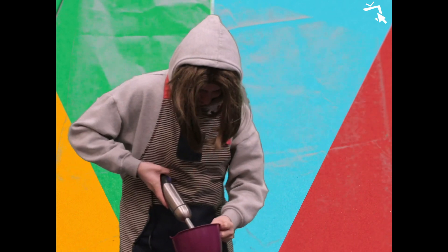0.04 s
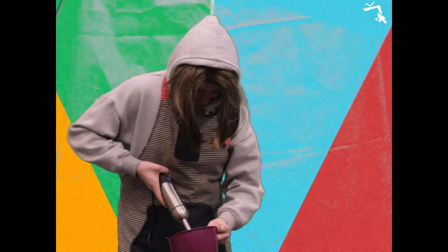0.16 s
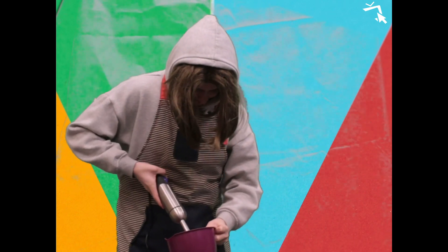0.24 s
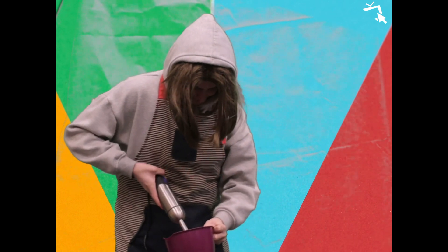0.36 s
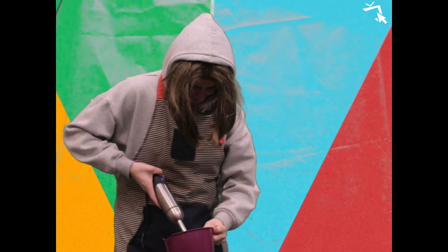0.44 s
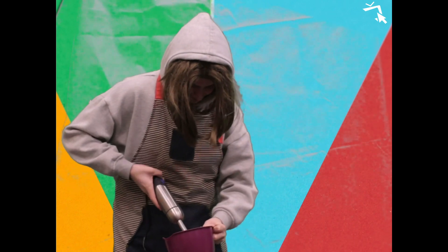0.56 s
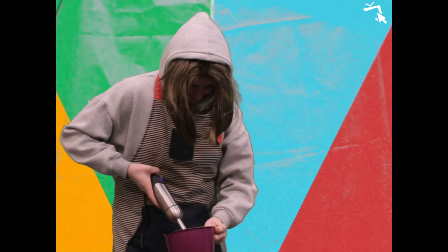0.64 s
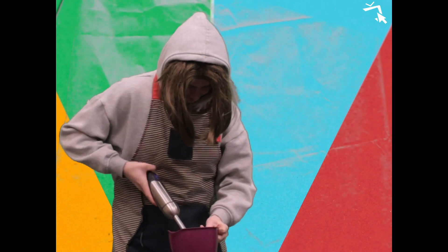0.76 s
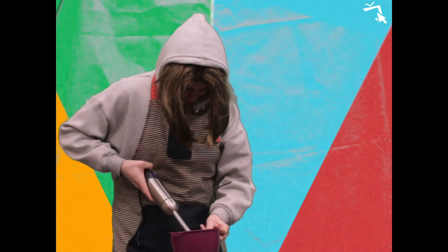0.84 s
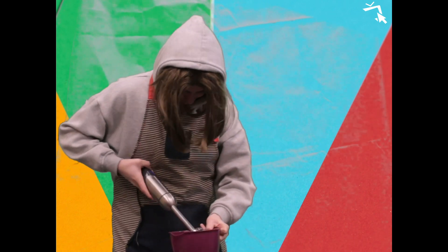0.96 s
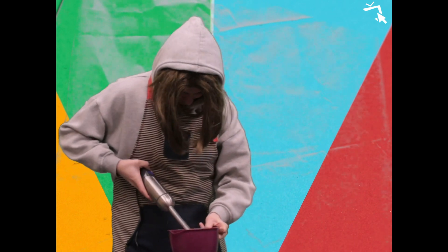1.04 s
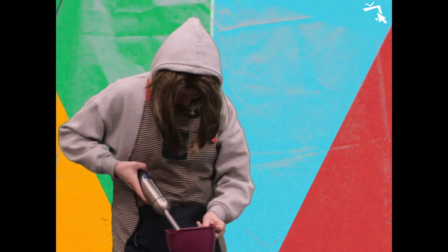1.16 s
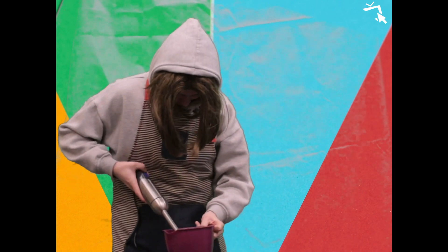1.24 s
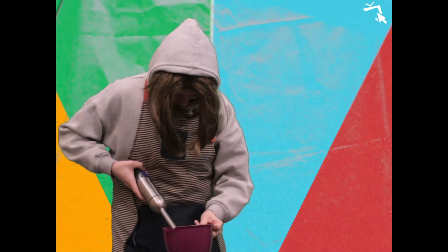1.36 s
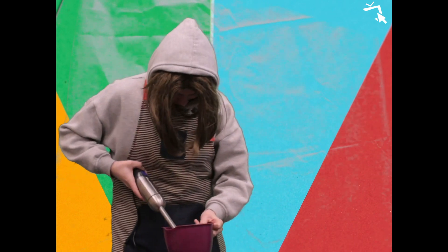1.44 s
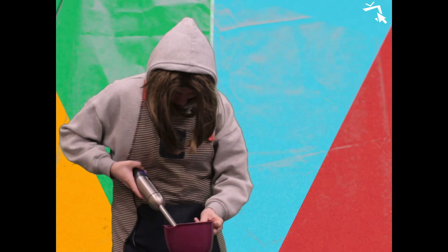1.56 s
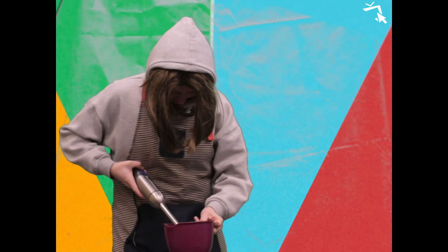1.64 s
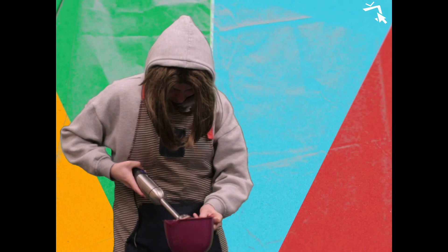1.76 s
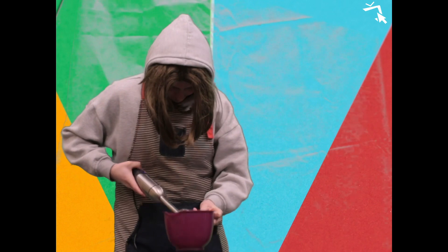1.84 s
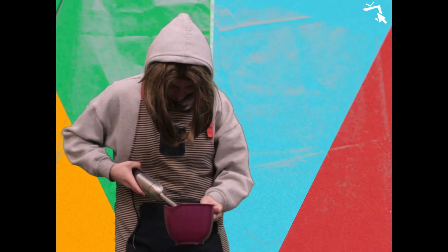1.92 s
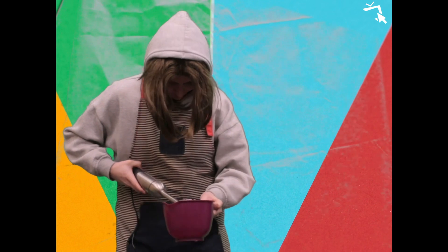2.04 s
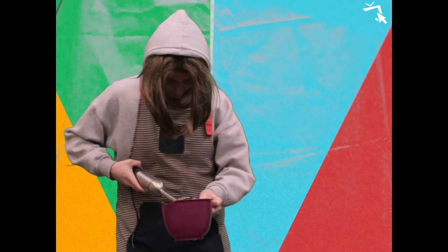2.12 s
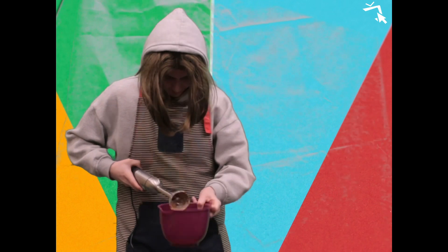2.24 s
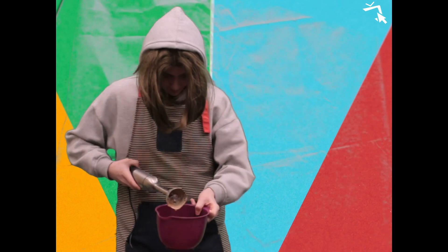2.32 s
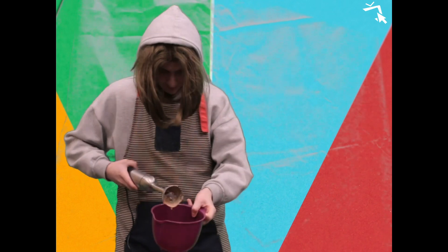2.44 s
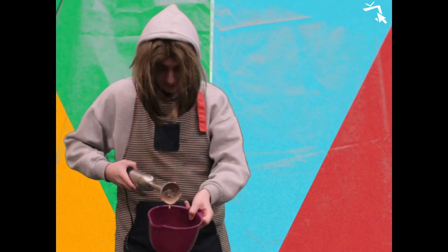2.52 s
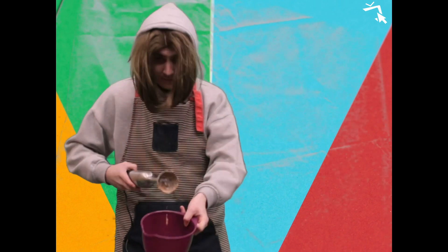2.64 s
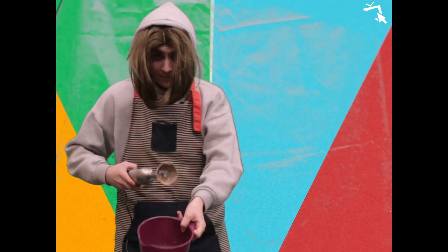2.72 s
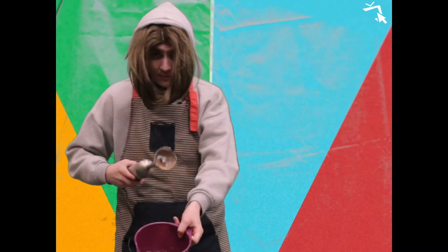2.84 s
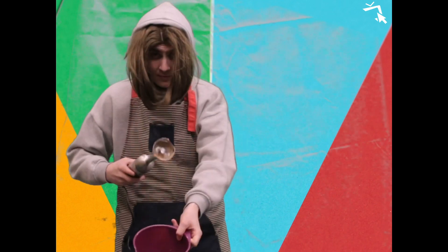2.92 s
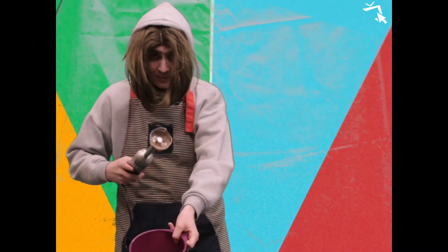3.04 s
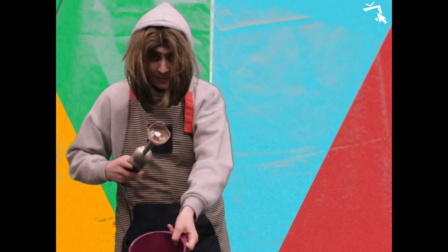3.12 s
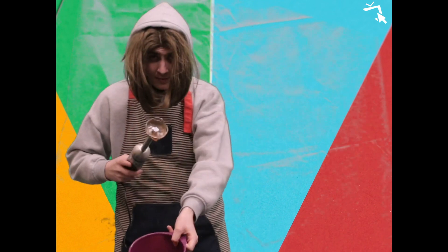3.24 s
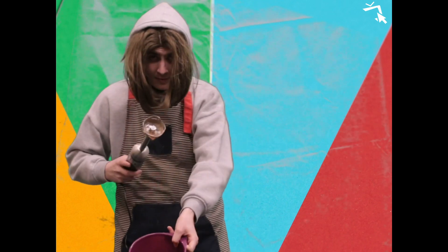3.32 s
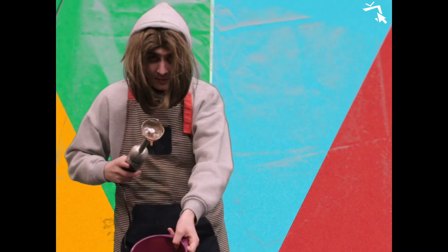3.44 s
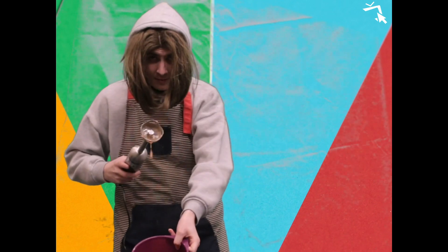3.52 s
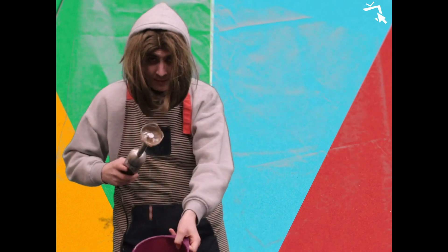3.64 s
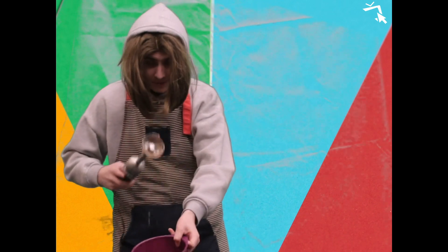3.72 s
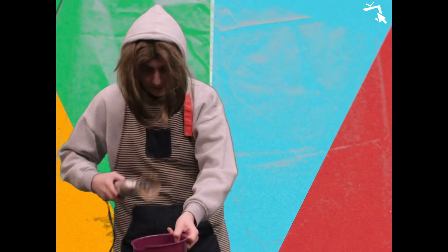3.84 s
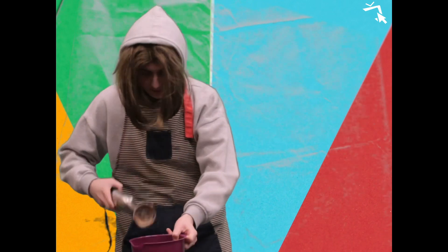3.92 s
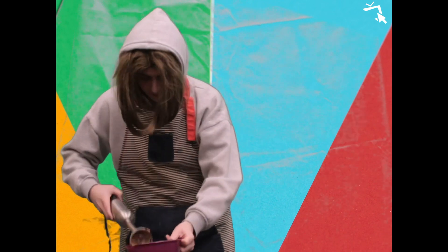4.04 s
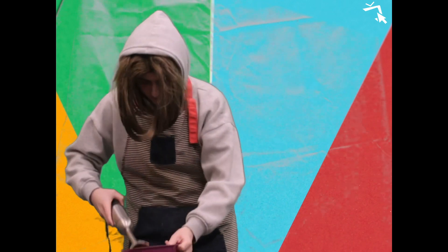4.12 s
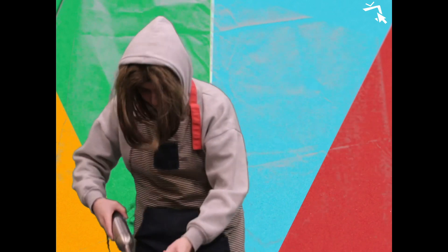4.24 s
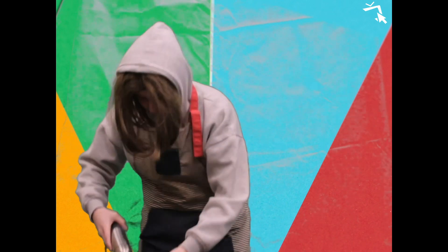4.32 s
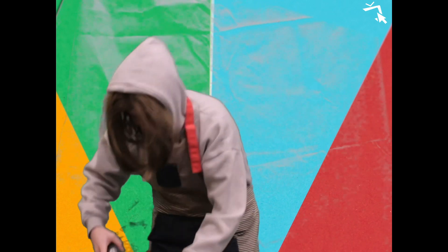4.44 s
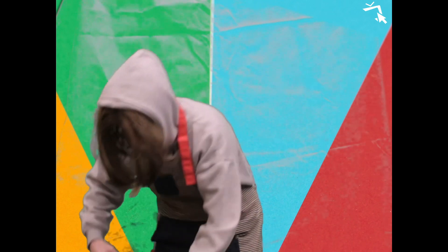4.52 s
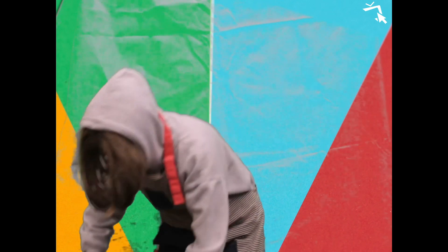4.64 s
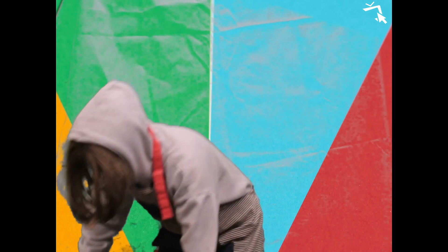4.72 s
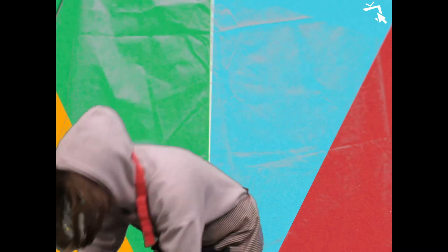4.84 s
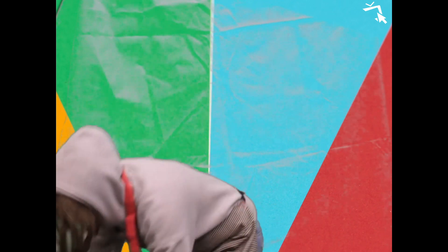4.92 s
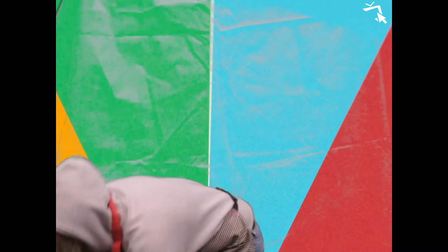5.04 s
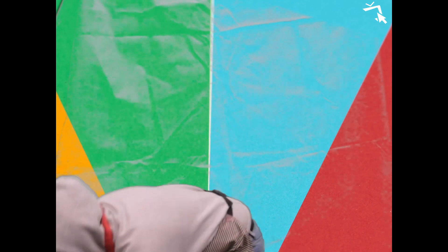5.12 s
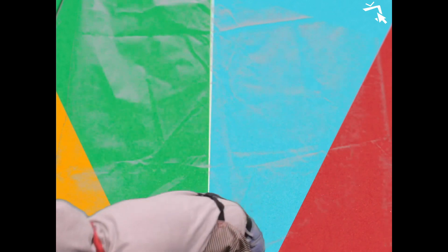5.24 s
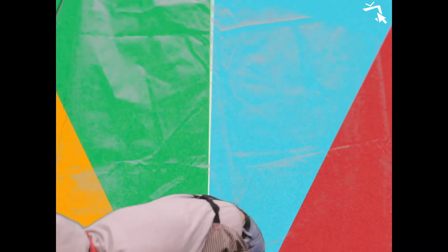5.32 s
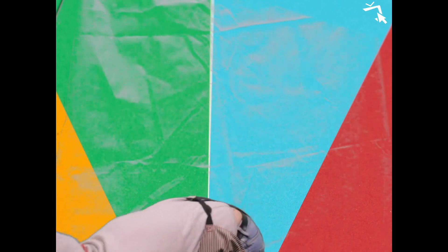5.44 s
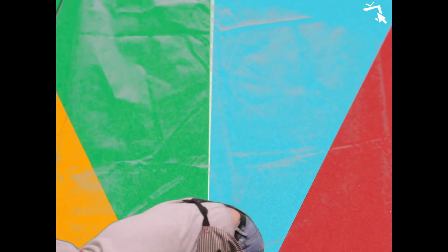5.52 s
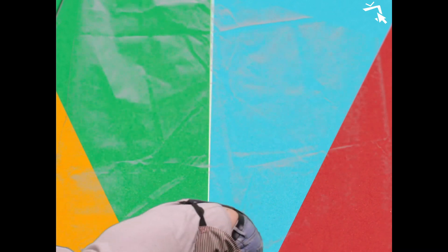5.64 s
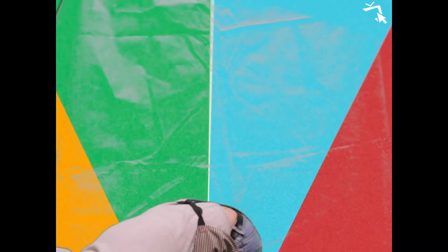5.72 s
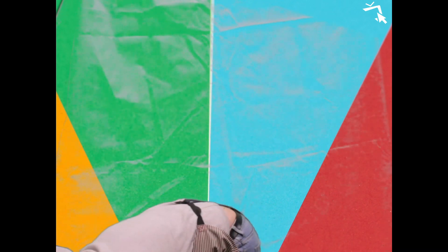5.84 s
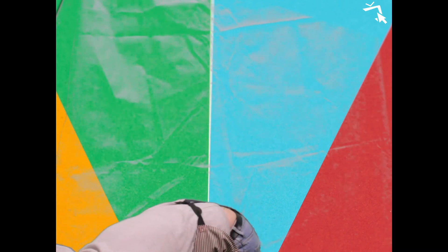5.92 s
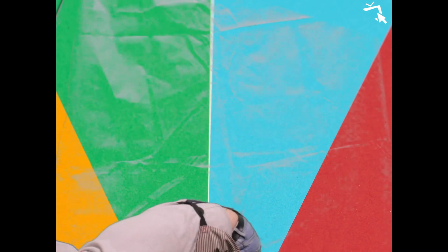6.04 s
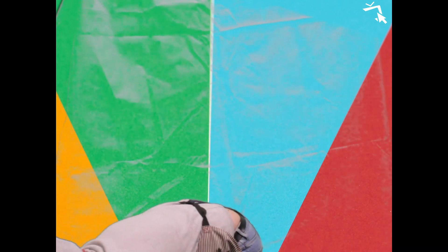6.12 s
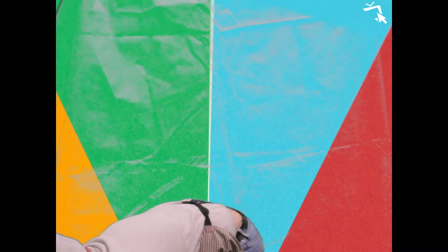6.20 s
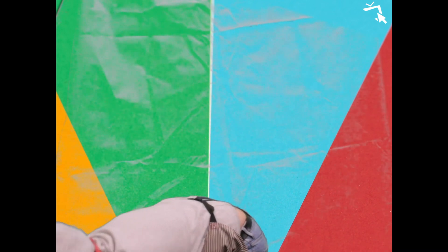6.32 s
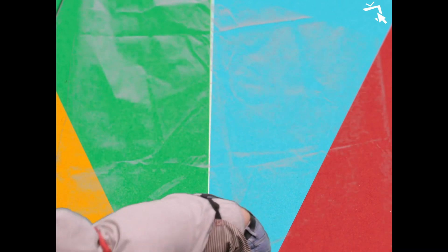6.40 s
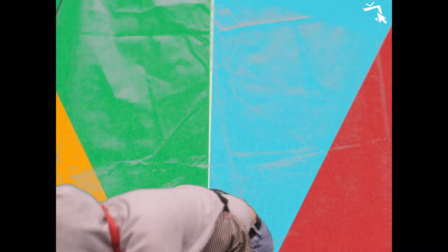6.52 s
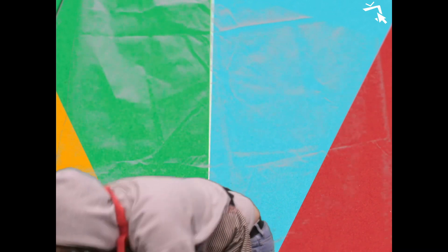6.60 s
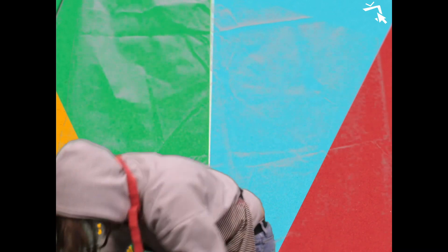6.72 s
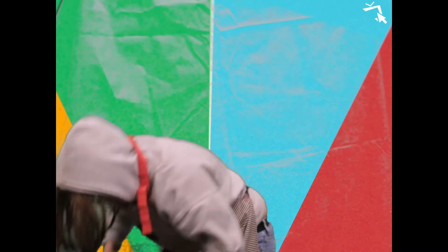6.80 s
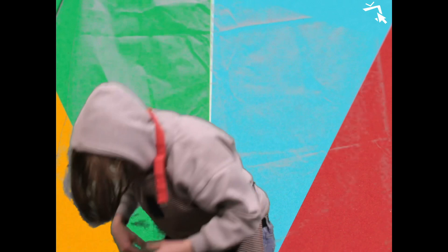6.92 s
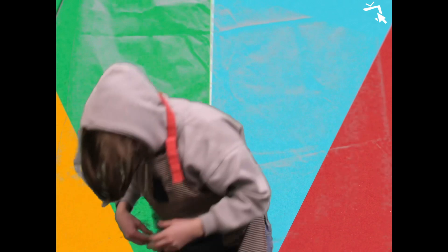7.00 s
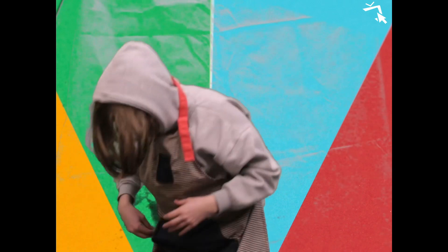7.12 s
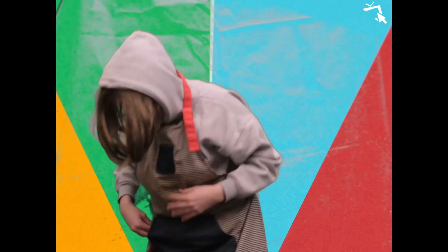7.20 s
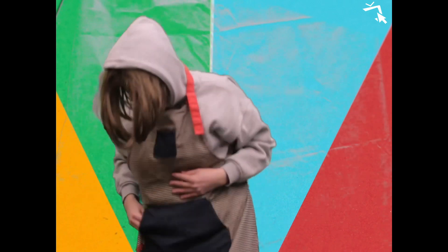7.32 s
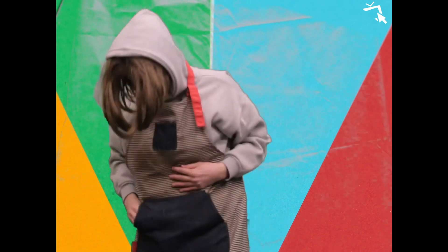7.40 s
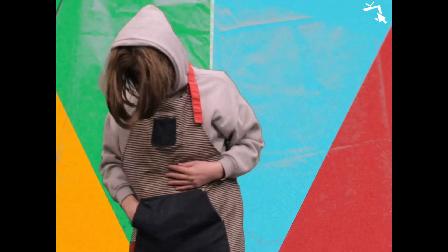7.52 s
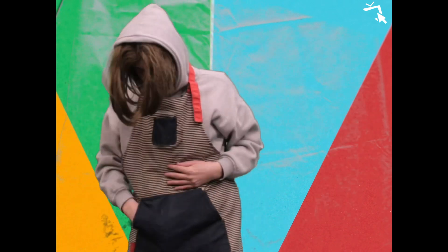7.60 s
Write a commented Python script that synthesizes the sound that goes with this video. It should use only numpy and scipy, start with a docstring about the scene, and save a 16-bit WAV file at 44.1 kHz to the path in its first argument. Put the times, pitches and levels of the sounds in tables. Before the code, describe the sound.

A stick blender drums and chatters in a plastic bowl, rasps out, winds down whining, then clothes rustle and bowl and blender are knocked and set down.

```python
"""A handheld stick blender drums and chatters with its bell pressed into a plastic bowl: multiples of the shaft
speed and noise pulsing with each turn. Switched off, it rasps up the bowl's wall and winds down in the air as a
falling whine with a thin whistle, while drops ring briefly and the slow rotor catches once a turn. Clothes rustle
near the microphone as filtered noise, with dry snaps; later bowl and blender are knocked and set down, with
ringing bowl modes, sharp cracks and a short drag on the floor. A small room and a faint hush lie under it all."""
import sys
import numpy as np
from scipy import signal
from scipy.fft import rfft, irfft
from scipy.io import wavfile
from scipy.ndimage import uniform_filter1d

SR = 44100
rng = np.random.default_rng(int(sys.argv[2]) if len(sys.argv) > 2 else 0)


def store_pcm(level_fs):
    """Save levels as 16-bit WAV."""
    pcm = np.round(np.clip(level_fs, -1, 1) * 32767).astype(np.int16)
    wavfile.write(sys.argv[1], SR, np.atleast_2d(pcm).T)


N = 337982
TIME = np.arange(N) / SR   # s


def amp(db):
    """Gain of a level in dB."""
    return 10 ** (np.asarray(db) / 20)


def rms_one(x):
    """Scale to unit power."""
    return x / np.sqrt(np.mean(x ** 2) + 1e-20)


def in_time(rows):
    """Columns of a curve, read at every sample."""
    s, *columns = np.transpose(rows)
    return [np.interp(TIME, s, column) for column in columns]


def within(rows):
    """One while a curve lasts, with 20 ms fades outside it."""
    start, end = rows[0][0], rows[-1][0]
    return np.interp(TIME, [start - .02, start, end, end + .02], [0, 1, 1, 0])


def at_hz(points, hz):
    """Level of a spectrum, read on a log frequency axis."""
    point_hz, point_db = np.array(points)[:, 0], np.array(points)[:, 1]
    return np.interp(np.log(np.maximum(hz, 1)), np.log(point_hz), point_db)


def colour(x, spectrum):
    """Filter by a spectrum and scale to unit power."""
    gain = amp(at_hz(spectrum, np.fft.rfftfreq(N, 1 / SR)))
    return rms_one(irfft(rfft(x) * gain, N))


def high_pass(x, order, hz):
    """Keep what lies above a frequency."""
    return signal.sosfilt(signal.butter(order, hz, "high", fs=SR, output="sos"), x)


def drift(rate):
    """Random wander: normal values at a rate per second, joined by straight lines."""
    knots = rng.standard_normal(int(N / SR * rate) + 2)
    return np.interp(TIME * rate, np.arange(len(knots)), knots)


def grains(per_s, spread_db):
    """Random clicks of uneven size and either sign."""
    sizes = amp(spread_db * np.minimum(rng.exponential(1, N), 4)) * rng.choice([-1, 1], N)
    return sizes * (rng.random(N) < per_s / SR)


def ring(clicks, hz, t60):
    """A damped resonance: a unit click starts a sine of height about 1 that loses 60 dB in t60 seconds."""
    radius, angle = amp(-60 / (t60 * SR)), 2 * np.pi * hz / SR
    feedback = [1, -2 * radius * np.cos(angle), radius * radius]
    return signal.lfilter([0, np.sin(angle)], feedback, clicks + 1e-18)


def clicks_at(times, heights):
    """A train of single-sample clicks."""
    out = np.zeros(N)
    np.add.at(out, np.round(np.asarray(times) * SR).astype(int), heights)
    return out


def each_turn(turns):
    """One click per revolution."""
    return np.diff(np.floor(turns), prepend=np.floor(turns[0]))


def pressed_bell(turns):
    """Each turn drums the bowl; loose contacts chatter in step with it; the drumming throbs as the bell
    wanders, and both swell when the bell skips."""
    # Bell on the bowl. Each row: time in seconds, drumming in dB, chatter in dB, lift of the treble in dB
    pressed = [(0.0, -23, -29.5, 2.5), (0.444, -24.5, -26.5, 1.5), (.58, -23.5, -28, 1.5),
               (0.628, -25, -29.5, 12), (0.72, -29, -28, 6)]
    # Harmonics of the drumming. Each row: multiple of the shaft speed, relative level in dB
    drumming = [(1, -19.5), (2, 1), (3, 2), (4, -2), (5, -18), (6, -11.5), (7, -10.5), (8, -19), (9, -12),
                (10, -18), (11, -24), (12, -18), (13, -24), (14, -24), (15, -25.5), (16, -27), (17, -36.5),
                (18, -31)]
    # Colour of the chatter. Each row: frequency in Hz, relative level in dB
    chatter_colour = [(60, -37), (150, -22), (220, -19.5), (400, -10), (620, 1), (800, -8), (1100, -21),
                      (1500, -12.5), (2000, -13), (3000, -16), (3700, -28), (5000, -27.5), (7000, -37.5),
                      (15500, -56)]
    # The bell skips and chatters harder. Each row: centre in seconds, extra level in dB, half-length in seconds
    skips = [(.003, 2, 0.0061), (0.056, 6.5, 0.019), (0.097, 6.5, 0.0082), (.172, 5, 0.0043),
             (0.271, 8, 0.014), (0.349, 5, 0.0061), (0.408, 4, 0.007), (0.46, 3, .008), (0.538, 0, 0.018)]
    throb_hz, throb_peak_s, throb_db = 11.37, 0.11, 2   # the bell wanders round on the bottom of the bowl
    drum_db, chatter_db, treble_db = in_time(pressed)
    throb = np.cos(2 * np.pi * throb_hz * (TIME - throb_peak_s))
    skip_db = sum(db * np.exp(-((TIME - s) / length) ** 2) for s, db, length in skips)

    short = int(.9 * SR)   # the drumming is over by then
    drum = np.zeros(N)
    for order, db in drumming:
        partial = np.sin(2 * np.pi * order * turns + 0.148 * order ** 2)
        drum[:short] += (amp(db + 4.5 * drift(30.38)) * partial)[:short]
    drum /= np.std(drum[:short])
    drum *= amp(drum_db + throb_db * throb + 0.32 * skip_db)

    gate = (1 + np.cos(2 * np.pi * turns)) + .7   # opens once a turn
    chatter = colour(gate * (rng.standard_normal(N) + grains(900, 3)), chatter_colour)
    treble = high_pass(chatter, 2, 6500)   # kept out of the surges
    surge = amp(skip_db + 2.14 * drift(38.3))
    chatter = amp(chatter_db) * (surge * (chatter - treble) + amp(treble_db) * treble)
    return within(pressed) * (drum + chatter)


def rasp(curve, spectrum, slips):
    """Slips ring the bowl's lower modes and scrape brightly."""
    grit = 0.61   # steady noise under the slips
    low_db, bright_db = in_time(curve)
    slips = rms_one(slips) + grit * rng.standard_normal(N)
    ringing = rms_one(bowl(slips, .5 * slips, 0 * slips))
    return within(curve) * (amp(low_db) * ringing + amp(bright_db) * colour(slips, spectrum))


def wall_rasp(turns):
    """The bell rasps up the wall of the bowl: uneven blade hits once a turn among random slips."""
    # Course of the rasp. Each row: time in seconds, low ring in dB, bright scrape in dB
    course = [(.70, -39, -42), (.725, -30, -27), (.754, -18.5, -20), (.782, -38.5, -19.5),
              (.805, -28, -24.5), (.815, -48, -44)]
    # Colour of the scrape. Each row: frequency in Hz, relative level in dB
    scrape_colour = [(500, -37.5), (800, 1.5), (960, 3), (1200, -2.5), (1480, 3), (1900, -9.5),
                     (2400, -8.5), (3300, -17), (4640, -19), (6000, -27.5), (7200, -22.5), (15500, -49)]
    blade_hits = each_turn(turns) * amp(1.5 * rng.standard_normal(N))
    return rasp(course, scrape_colour, blade_hits + .4 * grains(900, 2))


def coasting_motor(speed, turns):
    """Multiples of the falling speed slide through the housing's colour; commutator bars whistle above."""
    # Free running. Each row: time in seconds, level of the whine in dB
    coasting = [(0.815, -31), (1.073, -35), (1.319, -40.5), (1.561, -44.5), (1.7, -53), (1.85, -68),
                (2.1, -70), (2.2, -75)]
    # Housing's colour for whine and brushes. Each row: frequency in Hz, relative level in dB
    housing = [(90, -14), (160, -11), (260, -8), (320, 4.5), (500, 5), (750, 2), (1050, 5), (1350, -4),
               (1600, -2), (1800, -1), (2100, 1.5), (2500, -11), (3200, -19), (5000, -64)]
    # Colour of the air and bearing noise. Each row: frequency in Hz, relative level in dB
    air_colour = [(59, -51), (100, 3), (238, -22), (319, 0), (497, -15), (541, -28), (1020, 1.5),
                  (1460, -18.5), (2090, -3), (3390, -6), (15500, -23.5)]
    # Relative level in dB of multiples 1, 2, .. of the bar rate
    whistles_db = [10, 1, -3, -3, -3, -4]
    # Colour of the whistle. Each row: frequency in Hz, relative level in dB
    whistle_colour = [(1500, -22), (2500, -13), (3500, -7), (4500, -0.5), (5300, 0), (6500, -3), (8300, -3),
                      (9300, -28)]
    # Course of the whistle. Each row: time in seconds, gain in dB
    whistling = [(.82, -59), (1.15, -58), (1.3, -56.5), (1.55, -57.5), (1.75, -62), (1.85, -74),
                 (1.9, -100)]
    bars = 24   # on the commutator
    waver_db, air_below_db = 3.5, -13.5   # waver of each multiple; air against the whine

    short = int(2.3 * SR)   # the motor is silent by then
    whine, whistle = np.zeros(N), np.zeros(N)
    for order, start in enumerate(rng.random(30), 1):
        waver = drift(8.93) + .6 * drift(39.94)
        db = at_hz(housing, order * speed) + waver_db * waver - 0.24 * order
        whine[:short] += (amp(db) * np.sin(2 * np.pi * (order * turns + start)))[:short]
    whine /= np.sqrt(uniform_filter1d(whine ** 2, size=4096) + 1e-9)   # even out the power
    for k, db in enumerate(whistles_db, 1):
        db = db + at_hz(whistle_colour, k * bars * speed) + 3 * drift(25)
        whistle[:short] += (amp(db) * np.sin(2 * np.pi * k * bars * turns))[:short]

    air = colour(rng.standard_normal(N), air_colour)
    rub = (1 + np.cos(2 * np.pi * turns)) ** 1.1 + 0.24   # the brushes rub hardest once a turn
    brushes = colour(rub * rng.standard_normal(N), housing)
    clean = np.clip((speed - 35) / 60, 0, 1)   # a slow rotor rattles rather than sings
    body = clean * whine + (1.2 - clean) * brushes + amp(air_below_db) * air
    return within(coasting) * amp(in_time(coasting)[0]) * body + (
        within(whistling) * amp(in_time(whistling)[0]) * whistle)


def drops():
    """Drops flung from the blade: each is a short ring with a bright tick."""
    # Each row: start in seconds, level in dB, pitch in Hz
    flung = [(0.8943, -22.5, 2860), (0.9555, -25, 2540), (1.01, -29.5, 2790), (1.0458, -18.5, 2260),
             (1.0686, -24.5, 2380), (1.1047, -23.5, 2540), (1.137, -29.5, 2530), (1.1907, -24.5, 2900),
             (1.215, -33, 2890)]
    tick_db, tick_spread_db = -43, 4
    heights = amp(tick_db + tick_spread_db * rng.standard_normal(len(flung)))
    ticks = ring(clicks_at([s for s, _, _ in flung], heights), 8300, 0.0059)
    return ticks + sum(ring(clicks_at([s], amp(db)), hz, 0.0063) for s, db, hz in flung)


def catches(turns):
    """The slow rotor catches once a turn and rings a few modes, each with a drifting strength."""
    # Course of the catching. Each row: time in seconds, strength in dB
    catching = [(1.2, -56), (1.5, -47), (1.7, -50), (1.95, -50), (2.05, -51), (2.1, -57), (2.2, -66)]
    # Modes it rings. Each row: frequency in Hz, relative level in dB, 60 dB decay in seconds
    modes = [(700, -8, .03), (1050, 0, .035), (1620, -5, .025), (2050, -13, .02)]
    catch_s = 1.957   # moment of one catch, sets the angle
    ticks = each_turn(turns - turns[round(catch_s * SR)])
    ticks = ticks * within(catching) * amp(in_time(catching)[0])
    soft_contact = np.hanning(30) / 9
    ticks = np.convolve(ticks, soft_contact)[:N]
    return sum(ring(ticks * amp(db + 1.2 * drift(18)), hz, t60) for hz, db, t60 in modes)


def bowl(low, mid, high):
    """The bowl's modes ring, with one drive each for those below 1 kHz, up to 2.6 kHz and above."""
    # Each row: frequency in Hz, relative level in dB, 60 dB decay in seconds
    modes = [(262, -30.5, 0.073), (382, -40.5, 0.044), (565, -12, 0.11), (592, -20, 0.053), (626, 1, 0.043),
             (741, -10, .04), (830, -10.5, 0.033), (1312, -15.5, 0.02), (1490, -15, 0.016),
             (1880, -11.5, 0.011), (2260, -13, 0.0072), (3320, -20.5, 0.0044), (4900, -26.5, 0.0067)]
    out = np.zeros(N)
    for hz, db, t60 in modes:
        drive = low if hz < 1000 else mid if hz < 2600 else high
        out += amp(db) * ring(drive, hz, t60)
    return out


def knocks():
    """Blows on the bowl: contact hardness and place decide how much the upper modes get."""
    # Each row: time in seconds, strength in dB, lift of the middle modes in dB, lift of the high modes in dB
    blows = [(4.1357, -53.5, 7, 30), (4.2223, -49.5, -10, 36), (4.2658, -43.5, -6, 33.5),
             (4.2863, -20.5, 0, 0), (4.3017, -45, -2, 35), (4.3398, -29.5, -19, 17), (4.3624, -48, -4, 26),
             (4.4123, -40, -12, 20), (4.652, -30, 1, 17), (4.9222, -40, 16, 16), (5.0044, -31.5, 7.5, 23.5),
             (5.264, -35, 11, 16), (5.3199, -23, 8, 20), (5.3974, -34.5, 12, 33.5), (5.5181, -3, 4, -14),
             (5.6405, -31.5, 15, -5), (5.7044, -49, 9, 6), (5.7636, -24.5, 10.5, 16),
             (5.7836, -27.5, 13.5, 14), (5.8134, -22.5, 0, 17), (6.1864, -51, 11.5, 2),
             (6.4217, -35, 15.5, 28.5), (6.5834, -39, 5, 3)]
    s, db, mid_db, high_db = np.transpose(blows)
    soft = np.hanning(24) / np.hanning(24).sum()   # longer contact for the low modes
    hard = np.hanning(9) / np.hanning(9).sum()
    low = np.convolve(clicks_at(s, -amp(db)), soft)[:N]
    mid = np.convolve(clicks_at(s, -amp(db + mid_db)), hard)[:N]
    high = np.convolve(clicks_at(s, -amp(db + high_db)), hard)[:N]
    return bowl(low, mid, high)


def snaps_and_cracks():
    """Dry snaps of cloth, cord and fingers, and the sharp cracks of some bowl knocks: dying noise over a thump."""
    # Each row: start in seconds, dull part in dB, bright part against it in dB, thump in dB
    bursts = [(2.6638, -41, -7, -32.5), (2.707, -28.5, -10, -40), (2.9071, -31, -11, -34),
              (3.7587, -36.5, -10, -41), (3.952, -36.5, -19, -68), (4.3865, -34.5, -18, -38),
              (4.6862, -32, 6, -30), (4.6927, -25, -17, -45), (4.7124, -30, -3, -23.5),
              (4.7819, -12.5, -13, -16), (4.836, -14, -13, -16.5), (5.0466, -37, 0, -52),
              (5.063, -21.5, -6, -46), (5.0672, -21, -22, -39), (5.0859, -18, -18, -35),
              (5.0905, -23, 0, -33), (5.0985, -17, -1.5, -16.5), (5.1076, -23, -14, -24),
              (5.11, -15.5, -26, -26), (5.296, -26, -13, -49), (5.3368, -17.5, -26, -37),
              (5.5185, -11.5, -32, -9.5), (5.6414, -28, -15, -52), (5.748, -34, -14, -51),
              (5.762, -23, -17, -33), (5.8131, -21, -3, -33), (6.2601, -33, -8, -33),
              (6.3803, -42, -18, -49), (6.3928, -29.5, -19, -43), (6.4212, -35, -16, -45),
              (6.4924, -31, -13, -41), (6.6277, -37, -17, -54), (7.5493, -38.5, -12, -52),
              (7.623, -36, -25, -46)]
    length = 900   # samples
    out, t = np.zeros(N + length), np.arange(length) / SR
    # a click, then noise that dies within milliseconds
    noise = rng.standard_normal((len(bursts), length)) * np.exp(-t / 0.00078) + 2.7 * (t == 0)
    dull = signal.sosfilt(signal.butter(2, [500, 4000], "band", fs=SR, output="sos"), noise)
    bright = signal.sosfilt(signal.butter(2, [4000, 12500], "band", fs=SR, output="sos"), noise)
    thump = np.sin(2 * np.pi * 290 * t) * np.exp(-t / 0.0024)
    for (s, db, bright_db, thump_db), a, b in zip(bursts, dull, bright):
        burst = a / np.abs(a).max() + amp(bright_db) * b / np.abs(b).max()
        out[round(s * SR):][:length] += amp(db) * burst + amp(thump_db) * thump
    return out[:N]


def floor_drag():
    """The bowl is dragged to rest on the floor: dense random slips."""
    # Course of the drag. Each row: time in seconds, low ring in dB, bright scrape in dB
    course = [(5.755, -69, -74), (5.768, -33.5, -35), (5.82, -37, -30.5), (5.871, -53.5, -44.5),
              (5.93, -64, -69)]
    # Colour of the scrape. Each row: frequency in Hz, relative level in dB
    scrape_colour = [(150, -3), (250, -3.5), (400, -15), (630, -3.5), (950, -8), (1270, -3), (1500, -12),
                     (1810, -10), (2420, -17.5), (4700, -25.5), (15500, -42)]
    return rasp(course, scrape_colour, grains(1500, 2))


def clothes():
    """Each movement swells and fades; fabric slides in lumps: a low rumble and a swish of clumped fibre ticks."""
    # Each row: peak in seconds, rumble in dB, swish in dB, rise in seconds, fall in seconds
    moves = [(1.25, -53, -50.5, 0.17, 0.26), (1.352, -44, -68, 0.026, 0.036),
             (1.6, -58.5, -51.5, 0.33, 0.55), (2.37, -63.5, -69, 0.088, 0.033),
             (2.705, -47, -49.5, .25, 0.082), (2.92, -47.5, -49, 0.16, 0.087),
             (3.1, -57.5, -59.5, 0.27, 0.13), (3.3, -58.5, -66.5, 0.11, 0.45),
             (3.66, -62.5, -76, 0.095, 0.092), (3.77, -64.5, -62, 0.058, 0.44),
             (4.155, -54.5, -66, 0.035, 0.069), (4.32, -50.5, -46.5, 0.084, 0.18),
             (4.61, -51.5, -51.5, 0.095, 0.16), (4.72, -45, -43, 0.011, 0.071),
             (4.77, -41, -47, 0.046, 0.039), (4.82, -35.5, -41.5, 0.073, 0.034),
             (4.875, -45, -46, .04, 0.12), (5.065, -46, -44.5, 0.14, 0.027),
             (5.105, -37, -31.5, 0.028, 0.014), (5.18, -50, -53.5, 0.2, 0.052),
             (5.35, -39, -39.5, 0.21, 0.19), (5.55, -36.5, -48, 0.065, 0.087),
             (5.72, -62.5, -58.5, 0.085, 0.5), (6.265, -48.5, -54, 0.042, 0.12),
             (6.41, -46.5, -50, 0.067, 0.17), (6.59, -50.5, -53, .2, 0.3), (6.82, -58.5, -60, 0.19, 0.054),
             (7.0, -60, -64, 0.14, 0.11), (7.09, -58, -59.5, 0.09, 0.06), (7.14, -50.5, -57, 0.023, 0.088),
             (7.28, -45, -48.5, 0.057, 0.13), (7.54, -56, -57, 0.12, .12), (7.66, -62.5, -61.5, 0.16, .1)]
    # Colours of the two layers. Each row: frequency in Hz, relative level in dB
    rumble_colour = [(24, -44), (40, -42.5), (95, -5.5), (194, 1), (296, 3.5), (334, 1), (395, 1),
                     (496, -2), (1500, -26.5), (1950, -46), (3300, -120)]
    swish_colour = [(240, -41.5), (400, -3.5), (606, -3), (763, 0.5), (824, -4.5), (1650, -7.5),
                    (5140, -16.5), (10900, -27.5), (15800, -29.5)]
    fade_db = 18   # lost over one rise or fall time away from the peak
    crisp_db = 1   # lift of the swish above 4.5 kHz
    rumble_gain, swish_gain = 0, 0
    for s, rumble_db, swish_db, rise, fall in moves:
        away = np.where(TIME < s, (s - TIME) / max(rise, .01), (TIME - s) / max(fall, .01))
        shape = amp(-fade_db * away)
        rumble_gain = rumble_gain + amp(rumble_db) * shape
        swish_gain = swish_gain + amp(swish_db) * shape
    lumps = drift(45)
    rumble = colour(rng.standard_normal(N) * amp(1.7 * lumps), rumble_colour)
    fibres = rng.standard_normal(N) + grains(600, 4)
    swish = colour(amp(2.0 * lumps + 2.2 * drift(150)) * fibres, swish_colour)
    crisp = (amp(crisp_db) - 1) * high_pass(swish, 2, 4500)
    return rumble_gain * rumble + swish_gain * (swish + crisp)


def room(x):
    """Reflections blur into a diffuse, dull tail: softened noise that dies away exponentially."""
    room_db, t60_s = -23, 0.17
    t = np.arange(SR // 2) / SR
    dull_noise = signal.lfilter([.3], [1, -.7], rng.standard_normal(len(t)))
    tail = dull_noise * amp(-60 * t / t60_s) * (t > .006)
    return amp(room_db) * signal.fftconvolve(x, tail / np.sqrt(np.sum(tail ** 2)))[:N]


def background_hush():
    """Steady coloured noise, faint under everything."""
    # Each row: frequency in Hz, relative level in dB
    hush_colour = [(18, -62), (30, -45.5), (100, -14), (188, -12), (287, -1), (497, -8), (934, -19.5),
                   (2050, -14.5), (8250, -18.5), (14700, -23.5), (15900, -36)]
    hush_db = -61.5
    return amp(hush_db) * colour(rng.standard_normal(N), hush_colour)


def scene():
    """Blender and bowl share the room, its turning parts one shaft angle; clothes and hush are added dry."""
    # Shaft running and winding down. Each row: time in seconds, speed in turns per second
    shaft = [(0, 218.2), (.66, 218.6), (.7, 215), (.77, 196.4), (.83, 177.5), (1.05, 143.1), (1.25, 115.8),
             (1.45, 87.3), (1.65, 62.2), (1.82, 43), (1.9, 35), (2.0, 27.5), (2.08, 22), (2.3, 18)]
    speed, = in_time(shaft)
    turns = np.cumsum(speed * (1 + 0.0016 * drift(40))) / SR   # slightly unsteady
    near = pressed_bell(turns) + wall_rasp(turns) + coasting_motor(speed, turns) + drops() + catches(turns)
    near += knocks() + snaps_and_cracks() + floor_drag()
    near = high_pass(near, 3, 170)   # small things radiate no bass
    return (near + room(near) + clothes() + background_hush())[None]


def record(dry):
    """Peaks are clipped at full scale, then a steep low-pass cuts the top."""
    cutoff_hz = 16200
    low_pass = signal.cheby2(22, 60, cutoff_hz, fs=SR, output="sos")
    return signal.sosfilt(low_pass, np.clip(dry, -1, 1))


dry = scene()
out = record(dry)
store_pcm(out)
```